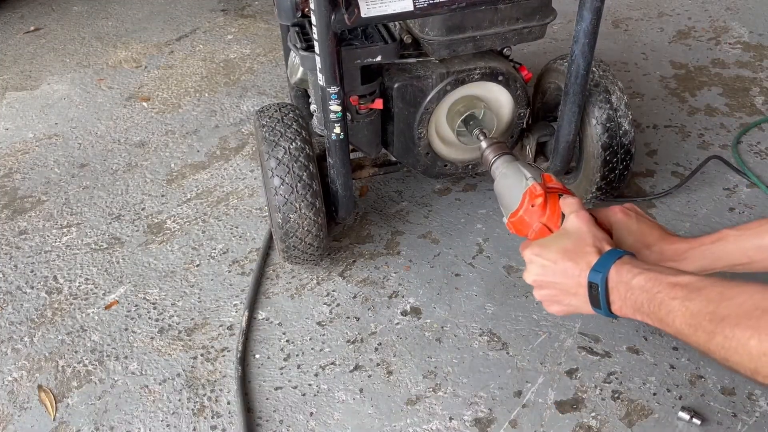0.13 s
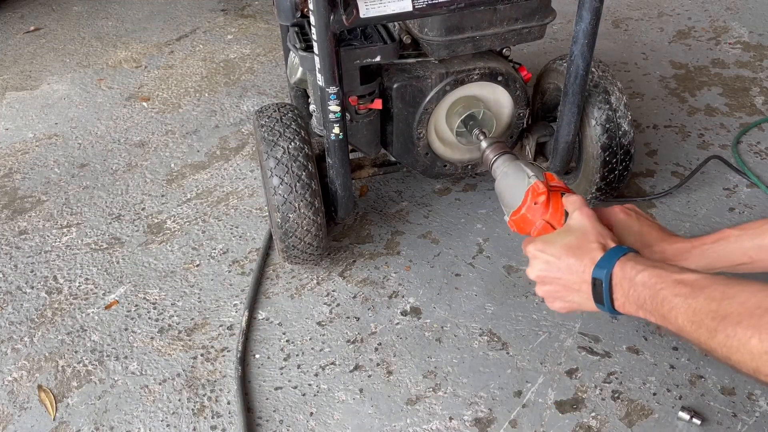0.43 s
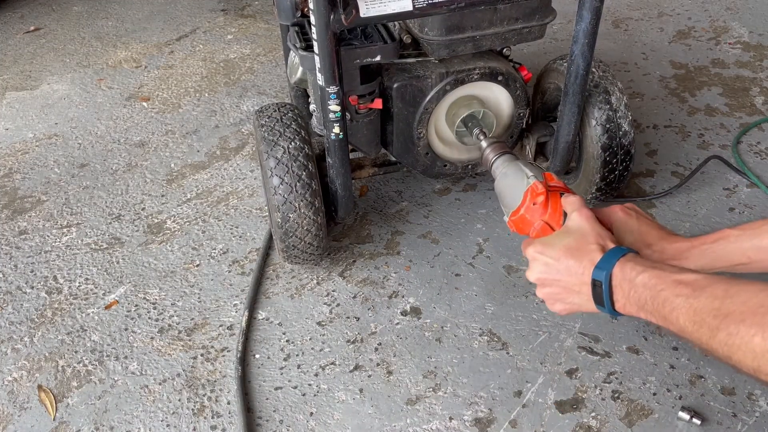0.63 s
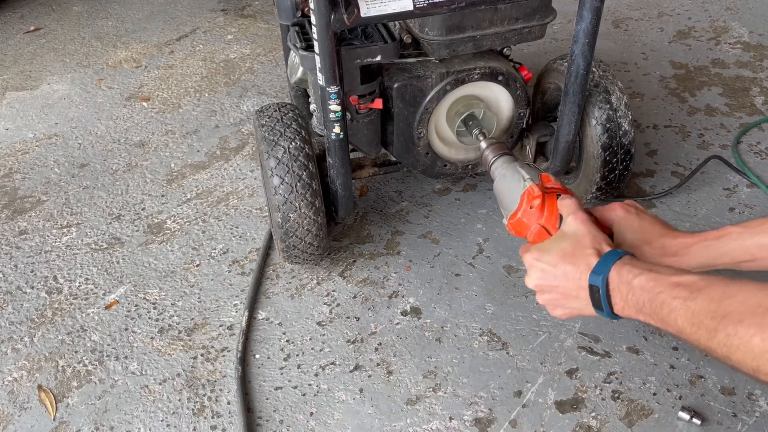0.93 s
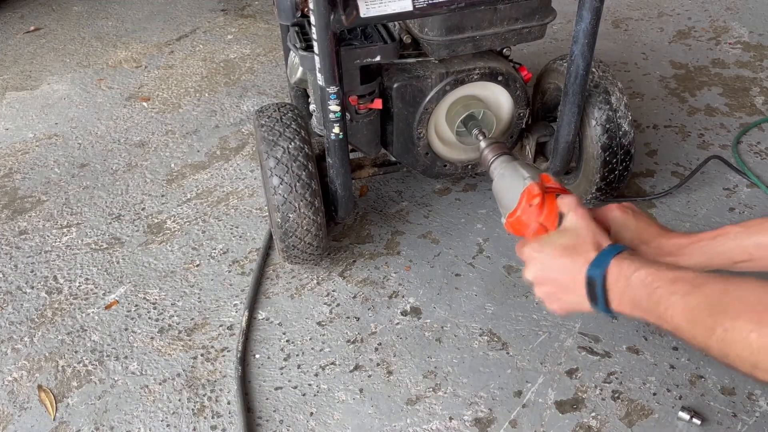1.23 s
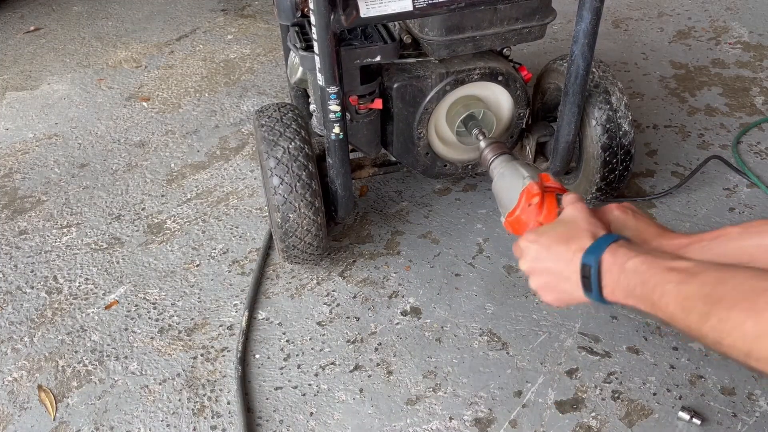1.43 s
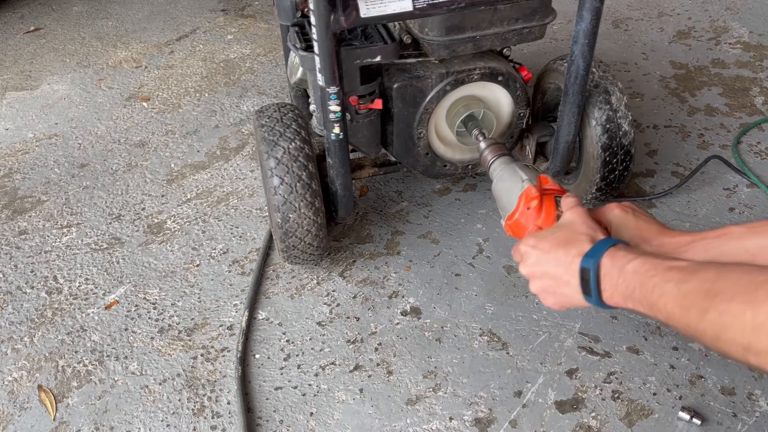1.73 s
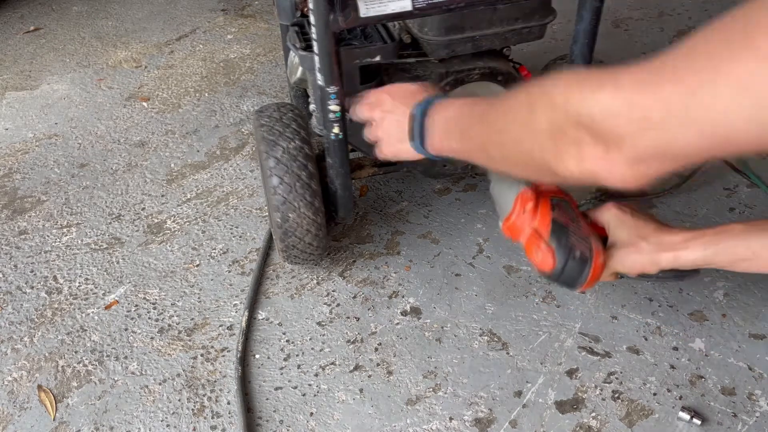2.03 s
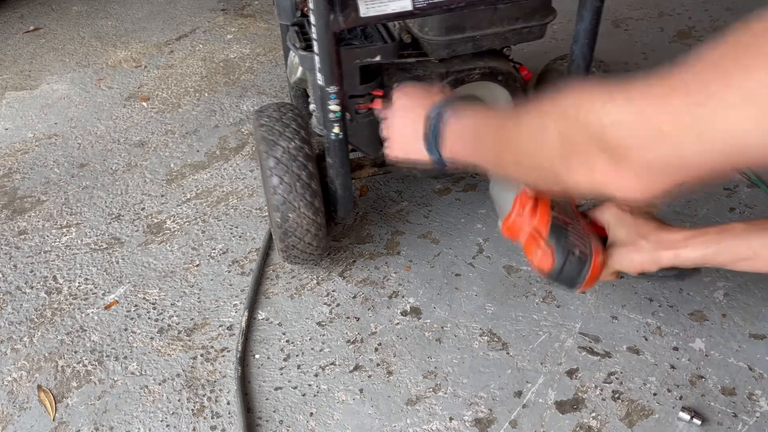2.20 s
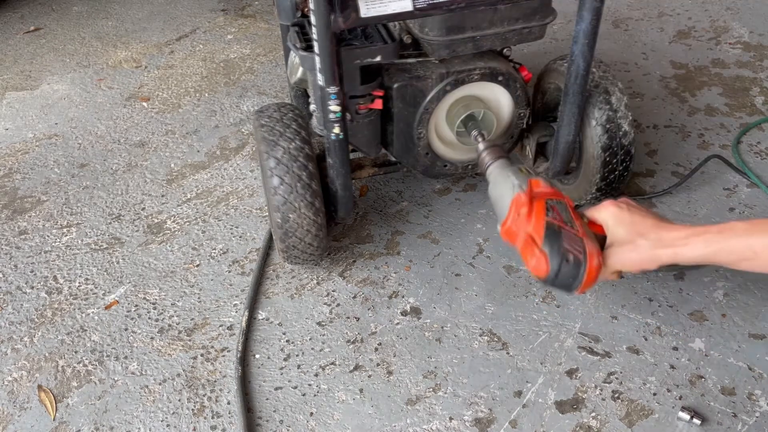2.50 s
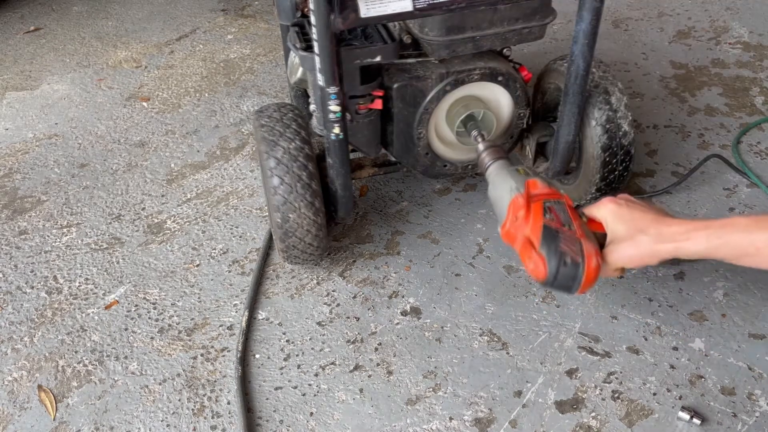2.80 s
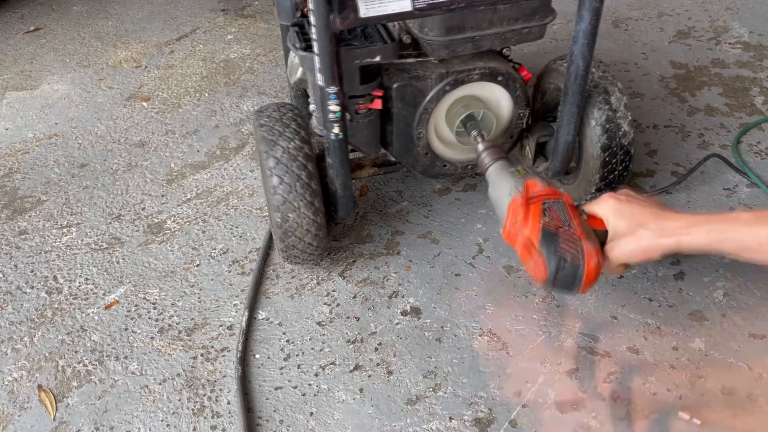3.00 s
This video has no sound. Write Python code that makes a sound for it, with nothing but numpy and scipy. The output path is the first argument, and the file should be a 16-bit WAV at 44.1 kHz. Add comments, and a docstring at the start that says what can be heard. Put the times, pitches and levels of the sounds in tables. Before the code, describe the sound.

Close stereo pickup of an electric drill turning a small engine: about a second of rough, pulsing gear rattle and squeal, then suddenly a cleaner thin whine with airy fan hiss, low drone and quick flutter.

```python
"""Over a concrete floor, about a metre away, a corded drill spins a small four-stroke engine by its flywheel nut.
For a second the engine drags on the motor: the gear whine sags, its third harmonic squeals, noise bands rattle
and rasp, and the valves puff as pressure pulses with damped rings. Then the load drops away at once and the
drill whines on over fan hiss and a drone of wavering sines, wobbling about twice per turn of the chuck."""
import sys
import numpy as np
from scipy import signal
from scipy.fft import rfft, irfft
from scipy.io import wavfile

SR = 44100
rng = np.random.default_rng(int(sys.argv[2]) if len(sys.argv) > 2 else 0)


def master_out(mix):
    """Clip the mix to full scale and print it as 16-bit PCM to the path in sys.argv[1]."""
    frames = np.transpose(np.atleast_2d(mix))
    ceiling = np.clip(frames, -1, 1)
    pcm = np.round(ceiling * 32767).astype(np.int16)
    wavfile.write(sys.argv[1], SR, pcm)


N = 138915  # samples, 3.15 s

# Gear whine before sags and jitter: time_s, pitch_hz
WHINE_PITCH = [(0, 2990), (.035, 2950), (.07, 3065), (.13, 3108), (.19, 3135), (.3, 3170), (.5, 3195),
               (.7, 3205), (1.1, 3200), (1.6, 3195), (2.0, 3180), (2.3, 3225), (3.15, 3213)]
# Fundamental of the whine before chokes, fades and wobble: time_s, level_db
WHINE_LEVEL = [(0, -45), (.12, -39.5), (.2, -32.5), (.28, -38.5), (.48, -39), (.66, -39.5), (.9, -44),
               (1.04, -46.5), (1.12, -51.5), (1.85, -51.5), (1.97, -45), (2.15, -48), (2.3, -45),
               (2.42, -47.5), (2.66, -43.5), (3.15, -46.5)]
# Third harmonic between drags, before trim and chance: time_s, level_db
SQUEAL_LEVEL = [(0, -61), (1.07, -47), (1.15, -40), (2.05, -42.5), (2.55, -45), (2.8, -53), (3.15, -54)]
# Other harmonics of the whine running free: multiple, level_db, left_right_phase_rad
OVERTONES = [(2, -55.5, 1.84), (4, -57.5, .3)]
# Lower tone of the loaded gears, before chance: time_s, level_db
GROWL_LEVEL = [(0, -53.5), (.4, -55), (.7, -54.5), (1.07, -50), (1.12, -60), (3.15, -69)]
# Engine cycles, timed at the exhaust puff: start_s, strength_db
CYCLES = [(.021, 2), (.204, -1), (.382, -1), (.560, 0.5), (.737, 0), (.914, -0.5), (1.092, -12)]
# Drags of the engine on the motor, about four a cycle: centre_s, half_length_s, squeal_db (before trim),
# pitch_sag_share
DRAGS = [(0.017, 0.0083, -36, 0.0048), (.074, .006, -25.5, .018), (0.108, 0.0066, -27.5, 0.011),
         (.148, 0.0093, -25, .013), (0.202, 0.0072, -26.5, 0.026), (.259, 0.0053, -26, .017),
         (0.288, 0.0036, -40, 0.0044), (.329, 0.0056, -30, 0.015), (0.383, .008, -26, .045),
         (0.436, 0.0039, -27, .02), (0.504, 0.0073, -28, 0.0097), (0.56, .008, -29, 0.041),
         (.611, 0.0042, -27.5, .018), (.681, 0.00514, -28.5, .014), (0.732, .009, -28.5, .045),
         (.788, .004, -29.5, 0.01804), (.828, 0.0038, -38, .003), (.858, .005, -24.5, 0.013),
         (0.91, .009, -27.5, 0.042), (0.962, .004, -33, 0.0084), (0.999, 0.0051, -40, 0.0028),
         (1.034, 0.00497, -25.5, .015), (1.08, .007, -27.5, .01)]
# Valve puffs in each cycle, before its strength: delay_s, half_length_s, signed_pressure (full scale 1),
# ring_hz, ring_t60_s, ring_db
PUFFS = [(.0005, 0.0016, -0.013, 178, 0.26, -45.5), (0.06, 0.002, 0.01, 67.5, 0.088, -45.5)]
# Low tones of the spinning machinery, before load and waver: pitch_hz, level_db
DRONE_TONES = [(37.7, -61.5), (75.4, -67), (161.5, -66), (183.0, -62), (398.4, -63.5)]
# Level change of the two deepest drone tones: time_s, change_db
DEEP_DRONE = [(0, 0), (1.7, 1), (2.7, 0), (3.15, -8)]
# Depth of the free drill's wobble as one hand lets go: time_s, depth_share
WOBBLE_DEPTH = [(1.1, .35), (1.8, .45), (2.3, .8), (2.6, 1.05), (3.15, .9)]
# Relative colour of fan air and brushes: freq_hz, density_db
AIR_COLOUR = [(25, -22), (40, 0), (100, -4), (300, -5), (600, -5.5), (1000, -1), (2500, -2), (3400, -2.5),
              (4200, -3.5), (5600, -9), (8000, -8), (8700, -21), (9400, -8), (10500, -9.5), (12500, -5.5),
              (14000, -6.5), (16000, -14.5)]
# Treble of the fan air, opening up as the hand leaves the drill: time_s, change_db
AIR_TREBLE = [(0, -3), (1.5, -0.5), (2.2, -.5), (2.6, 1), (3.15, 1)]
# Relative colour of the gear rattle: freq_hz, density_db
RATTLE_COLOUR = [(25, -34), (120, -7), (300, -8), (500, -1.5), (1200, -0.5), (2600, 2), (3500, 1.5),
                 (5000, -4), (7000, -6), (8000, -4), (8700, -13.5), (9400, 0), (10500, -5), (12500, 0),
                 (14000, -1.5), (16000, -11)]
# Rasps of the gears on compression: centre_s, half_length_s, level_db
RASPS = [(0.206, 0.013, -38.5), (0.471, 0.0083, -42), (0.739, 0.0084, -38.5), (0.921, 0.01, -39.5)]
# Relative colour of the rasps: freq_hz, density_db
RASP_COLOUR = [(300, -13), (700, -9), (1300, -4), (2200, 4), (3000, -8), (6300, -5), (9000, -18),
               (16000, -22)]
# Resonances of the gear case and engine cover: freq_hz, width_hz, boost_db
CASE = [(370, 69, 3.5), (515, 48, 3), (787, 27, 3), (1266, 180, 3.5), (1891, 24, 7.5), (1977, 18, 3.5),
        (3075, 170, 5), (3490, 174, 5), (4430, 220, 4.5), (5180, 415, 8), (6220, 130, 3.5),
        (12200, 200, 3.5), (12600, 200, 2)]
# Stereo width of the noise: freq_hz, side_to_mid_db
WIDTH = [(60, -14), (200, -13.5), (400, -6.5), (700, -5), (1300, -8), (1900, -9), (2300, -23), (2900, -5.5),
         (5100, -7), (5800, -1.5), (6700, -6), (7500, 2), (8700, 16), (9500, 8), (10500, 0), (12000, -2.5),
         (15000, -17)]

RELEASE_S, RELEASE_FALL_S = 1.091, 0.0043  # the load drops away
WHINE_PHASE_RAD, SQUEAL_PHASE_RAD, GROWL_PHASE_RAD = 0.57, -2.52, -0.78  # left-right
GROWL_RATIO = .4115  # share of the whine's pitch
CHOKE_DELAY_S, CHOKE_S, CHOKE_DB = .002, 0.027, -7  # the whine is choked at each compression
SAG_LAG, SAG_STRETCH = 2.13, 1.15  # the motor slows after the drag; both in half lengths of the drag
SAG_FADE_DB = 93  # whine loss per unit share of sag
SQUEAL_TRIM_DB, DRAG_SQUEAL_TRIM_DB = -3, -2.5
JITTER, FLUTTER = 0.001995, 0.34  # spread as a share of pitch, of level
WOBBLE_HZ, WOBBLE_AT_S, WOBBLE_LEAD_S = 22.39, 2.677, -.002
WOBBLE_SAG, WOBBLE_DB, WHINE_WAVER_DB = .032, 3, 0.77  # pitch share, swing and chance at full depth
SLACK_DELAY_S, SLACK_S, SLACK_RATTLE_DB = 0.033, 0.017, -3.5  # piston pushed back, gears go slack
AIR_DB, RATTLE_DB, DRAG_RATTLE_DB = -42, -38, 2.5  # the last is extra rattle on each drag
GRIT_DB = 1.75  # fast level chance inside the noise
MUFFLER_HZ, MUFFLER_T60_S, MUFFLER_DB = 367, 0.32, -48.5  # level before each cycle's strength
DRONE_DB, DRONE_LOADED_DB, DRONE_WAVER_HZ = 1.5, -4.5, 2.16  # trim, change under load, pitch spread
TOP_HZ = 15850


def undb(db):
    """Decibels to amplitude."""
    return 10 ** (np.asarray(db) / 20)


def unit(x):
    """Scale to rms 1."""
    return x / np.sqrt(np.mean(x ** 2))


def clock():
    """Time of every sample in seconds."""
    return np.arange(N) / SR


def curve(rows):
    """Straight lines through (time_s, value) rows."""
    return np.interp(clock(), *np.array(rows).T)


def walk(hz):
    """Smooth chance up to roughly a given rate, spread 1."""
    f = np.fft.rfftfreq(N, 1 / SR)
    return unit(irfft(rfft(rng.standard_normal(N)) * np.exp(-.5 * (f / hz) ** 2), N))


def colour(x, points):
    """Filter by a spectrum of (freq_hz, level_db) points."""
    f = np.fft.rfftfreq(N, 1 / SR)
    hz, db = np.array(points).T
    gain = undb(np.interp(np.log(f + 1), np.log(hz), db))
    return irfft(rfft(x) * gain, N)


def bump(at, half):
    """A smooth swell around a moment."""
    return np.exp(-.5 * ((clock() - at) / half) ** 2)


def each_cycle(delay, half):
    """A swell at the same place in every engine cycle."""
    return sum(bump(at + delay, half) for at, _ in CYCLES)


def ring(at, hz, t60):
    """A damped sine that starts at a moment."""
    age = np.maximum(clock() - at, 0)
    return np.sin(2 * np.pi * hz * age) * np.exp(-np.log(1000) * age / t60)


def tone(phase, lead):
    """A sine of rms 1 that reaches left and right out of step."""
    return np.sqrt(2) * np.sin(phase + np.array([[lead], [-lead]]) / 2)


def flutter():
    """Quick random changes of a tone's level."""
    return 1 + FLUTTER * walk(87)


def wobble(lead):
    """The hand-held drill wobbles about twice per turn of the chuck, with a drifting phase."""
    return np.cos(2 * np.pi * WOBBLE_HZ * (clock() + lead - WOBBLE_AT_S) + 0.33 * walk(4.8))


def rush(points):
    """Gritty stereo noise that rings the gear case, mid and side at rms 1 before the width is set."""
    f = np.fft.rfftfreq(N, 1 / SR)
    case = undb(sum(db / (1 + (2 * (f - hz) / width) ** 2) for hz, width, db in CASE))
    grit = undb(GRIT_DB * walk(1400))  # shared by mid and side

    def layer():
        """One independent noise through case and colour."""
        ringing = irfft(rfft(grit * rng.standard_normal(N)) * case, N)
        return unit(colour(ringing, points))

    mid = layer()
    side = colour(layer(), WIDTH)
    return mid + side * np.array([[1], [-1]])


def drone(load):
    """Low wavering tones of the spinning machinery; all but the deepest are held back by the load."""
    out = np.zeros(N)
    for k, (hz, db) in enumerate(DRONE_TONES):
        phase = 2 * np.pi * np.cumsum(hz + DRONE_WAVER_HZ * walk(15)) / SR
        level_db = DRONE_DB + db + 2.14 * walk(7.3)
        if k > 0:
            level_db = level_db + DRONE_LOADED_DB * load
        if k < 2:
            level_db = level_db + curve(DEEP_DRONE)
        out += undb(level_db) * np.sqrt(2) * np.sin(phase)
    return out


def fan(treble_hz=4000):
    """Cooling air and brush hiss, throbbing slightly with the wobble."""
    air = undb(AIR_DB + 0.22 * wobble(0) + .3 * walk(22)) * rush(AIR_COLOUR)
    highpass = signal.butter(1, treble_hz, "high", fs=SR, output="sos")
    treble = signal.sosfilt(highpass, air)
    return air + (undb(curve(AIR_TREBLE)) - 1) * treble


def valves():
    """Two pressure pulses in each cycle, each with a hollow ring; the cycle also rings the muffler."""
    out = np.zeros(N)
    for at, strength_db in CYCLES:
        air = undb(MUFFLER_DB) * ring(at, MUFFLER_HZ, MUFFLER_T60_S)
        for delay, half, pressure, hz, t60, ring_db in PUFFS:
            u = (clock() - at - delay) / half
            pulse = pressure * (1 - u ** 2) * np.exp(-u ** 2 / 2)
            # the ring starts against the sign of the pulse
            hollow = -np.sign(pressure) * undb(ring_db) * ring(at + delay + half, hz, t60)
            air = air + pulse + hollow
        out += undb(strength_db) * air
    return out


def gear_noise(load, slack):
    """Loose gears rattle only under load, most at each drag, and rasp on some compressions."""
    push_db = DRAG_RATTLE_DB * sum(bump(at, 1.05 * half) for at, half, _, _ in DRAGS)
    rattle_db = RATTLE_DB + push_db + SLACK_RATTLE_DB * slack + 1.44 * walk(33)
    rattle = load * undb(rattle_db) * rush(RATTLE_COLOUR)
    rasp = sum(undb(db) * bump(at, half) for at, half, db in RASPS) * rush(RASP_COLOUR)
    return rattle + rasp


def gear_whine(load):
    """The mesh tone sags at each drag as its third harmonic squeals; running free, it dips with each wobble."""
    sag = sum(share * bump(at + SAG_LAG * half, half * SAG_STRETCH) for at, half, _, share in DRAGS)
    free = (1 - load) * curve(WOBBLE_DEPTH)
    bind = free * ((1 - wobble(WOBBLE_LEAD_S)) / 2) ** 2 * (1 + 0.345 * walk(29.5))
    jitter = JITTER * (1 + 2 * bind) * walk(113)
    hz = curve(WHINE_PITCH) * (1 - sag - WOBBLE_SAG * bind + jitter)
    phase = 2 * np.pi * np.cumsum(hz) / SR

    choke_db = CHOKE_DB * each_cycle(CHOKE_DELAY_S, CHOKE_S)
    free_db = free * (WOBBLE_DB * wobble(0) + WHINE_WAVER_DB * walk(15))
    whine = undb(curve(WHINE_LEVEL) + choke_db - SAG_FADE_DB * sag + free_db) * flutter()

    drags = sum(undb(db) * bump(at, half) for at, half, db, _ in DRAGS) * (1 + 0.36 * walk(420))
    steady = undb(curve(SQUEAL_LEVEL) + SQUEAL_TRIM_DB + 2.5 * walk(25) - 3.7 * bind)
    squeal = (steady + drags * undb(DRAG_SQUEAL_TRIM_DB)) * flutter()

    # the other harmonics are 5.5 dB stronger under load
    overtones = sum(undb(db + 5.5 * load) * flutter() * tone(k * phase, lead) for k, db, lead in OVERTONES)
    growl = undb(curve(GROWL_LEVEL) + 3.6 * walk(30)) * tone(GROWL_RATIO * phase, GROWL_PHASE_RAD)
    pair = whine * tone(phase, WHINE_PHASE_RAD) + squeal * tone(3 * phase, SQUEAL_PHASE_RAD)
    return pair + overtones + growl


def scene(bass_pan_db=3.0):
    """Mix all layers; the load falls from 1 to 0 at the release, and the bass leans left."""
    load = .5 - .5 * np.tanh((clock() - RELEASE_S) / RELEASE_FALL_S)
    slack = load * each_cycle(SLACK_DELAY_S, SLACK_S)
    pan = undb(np.array([[bass_pan_db], [-bass_pan_db]]) / 2)
    bass = (drone(load) + valves()) * pan
    return bass + fan() + gear_noise(load, slack) + gear_whine(load)


def record(dry):
    """A steep low-pass cuts the top."""
    lowpass = signal.ellip(10, .2, 80, TOP_HZ, fs=SR, output="sos")
    return signal.sosfilt(lowpass, dry)


dry = scene()
out = record(dry)
master_out(out)
```